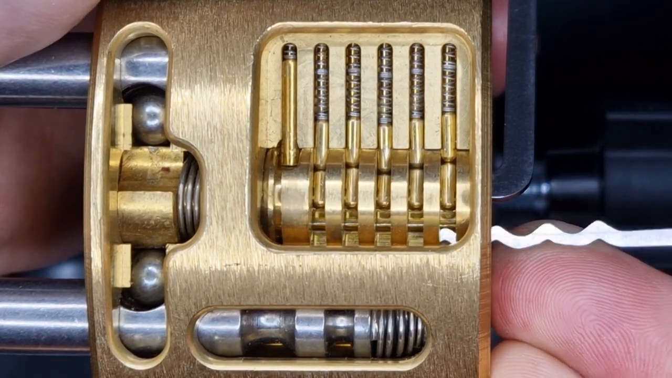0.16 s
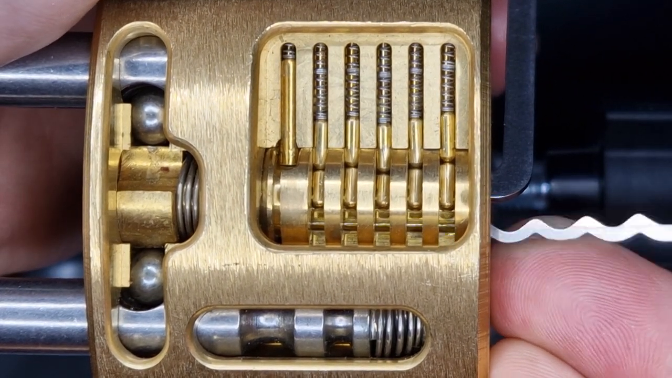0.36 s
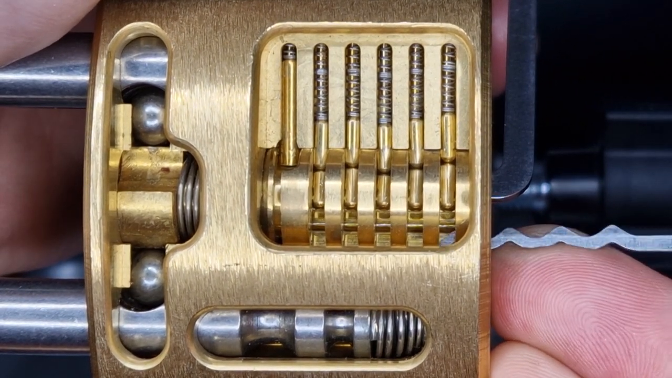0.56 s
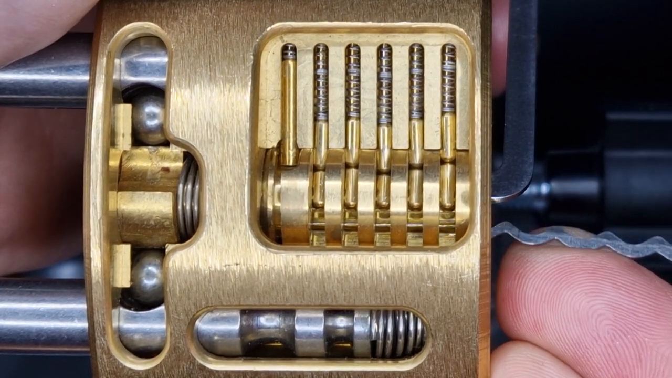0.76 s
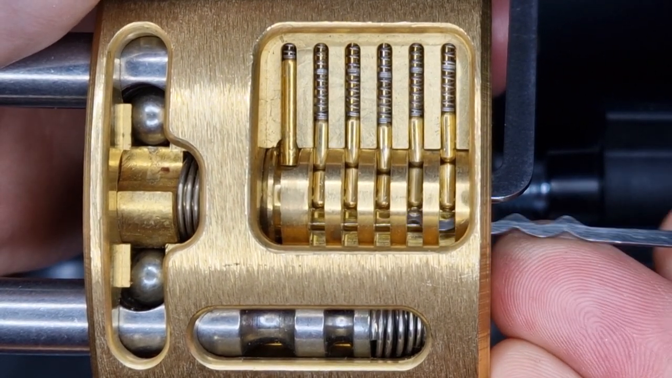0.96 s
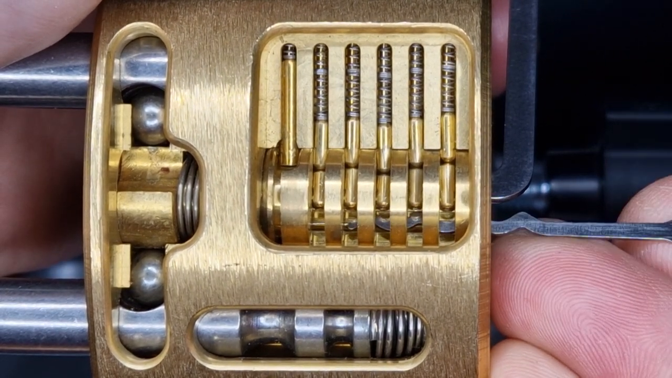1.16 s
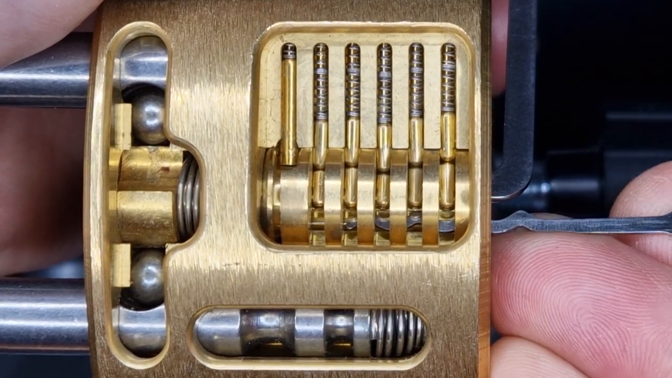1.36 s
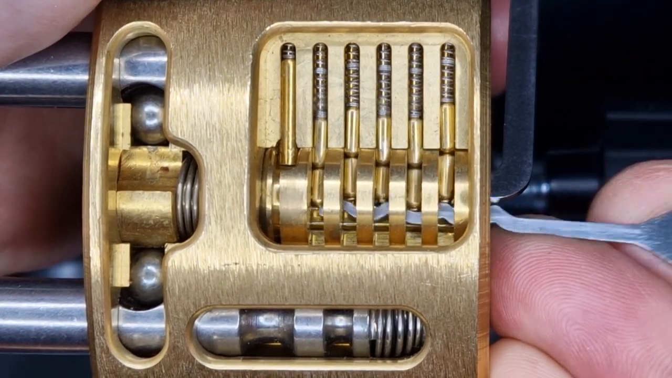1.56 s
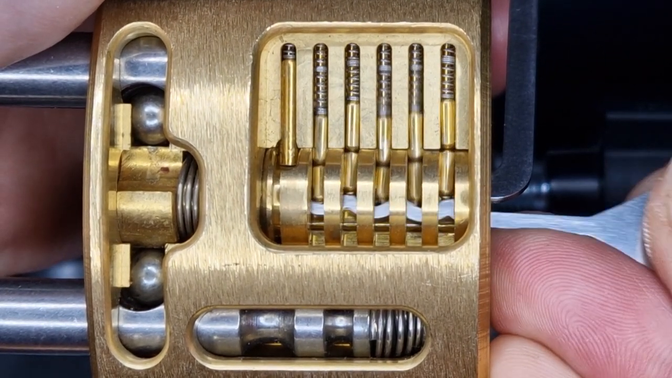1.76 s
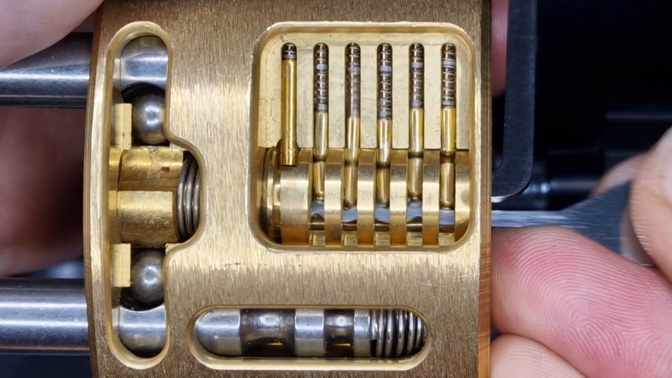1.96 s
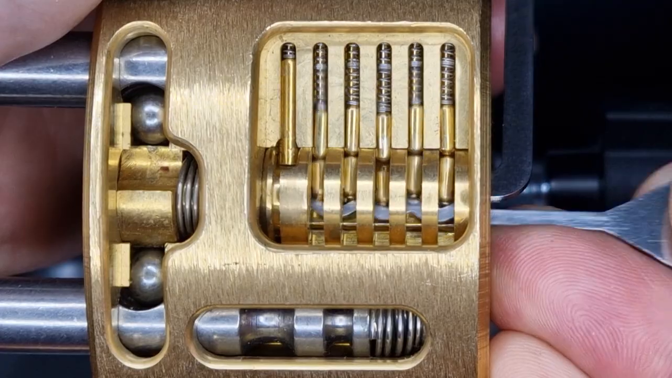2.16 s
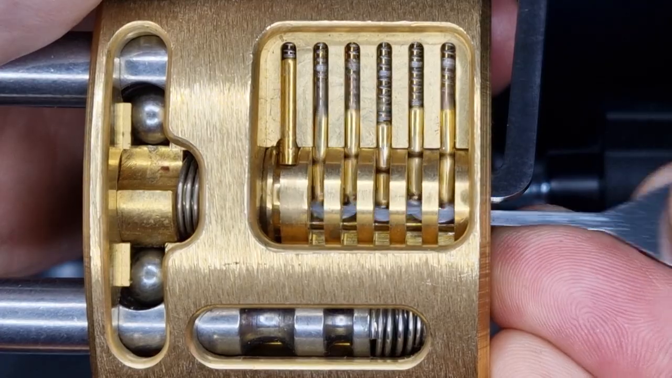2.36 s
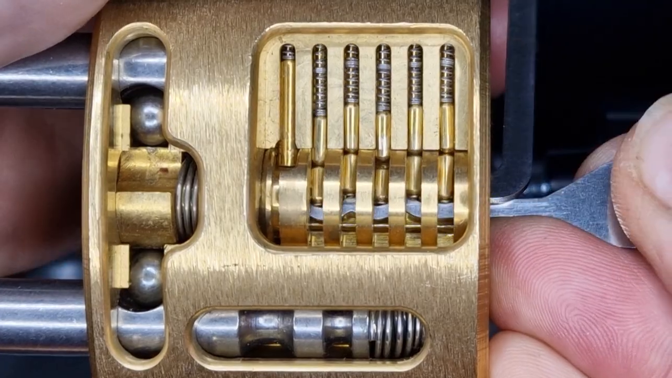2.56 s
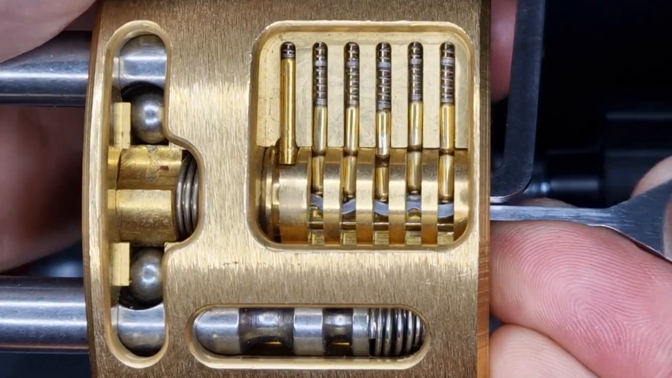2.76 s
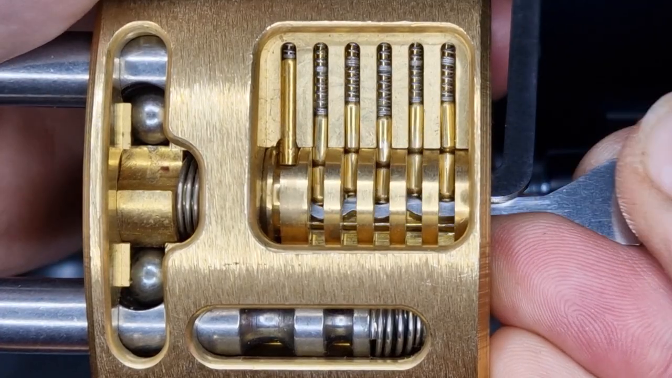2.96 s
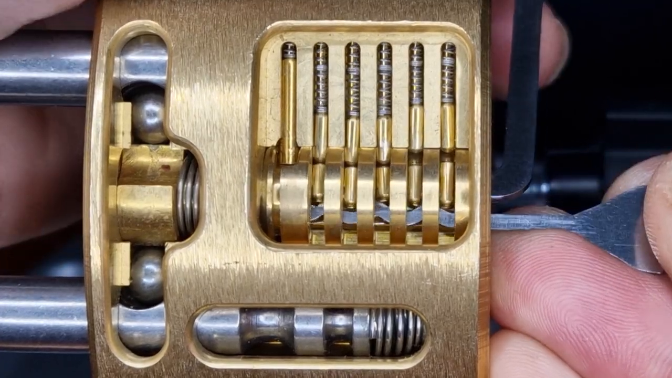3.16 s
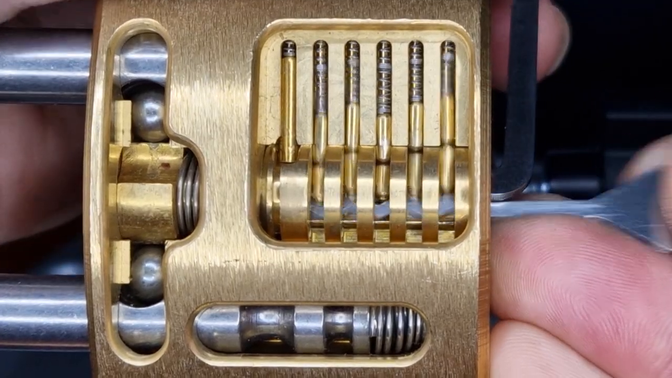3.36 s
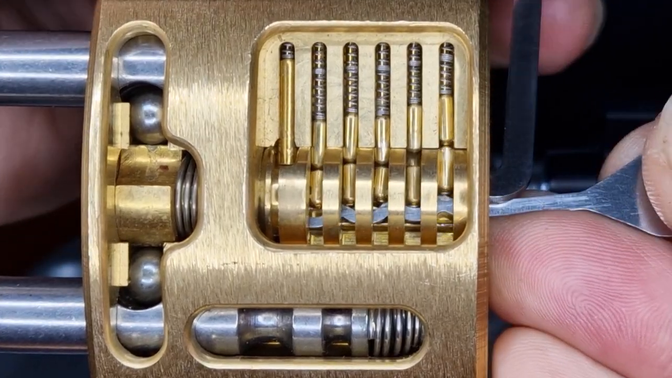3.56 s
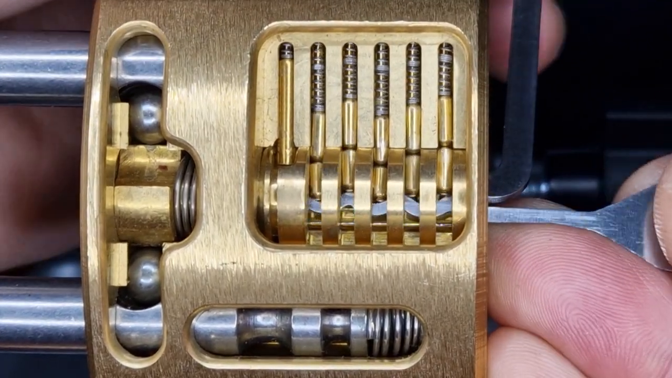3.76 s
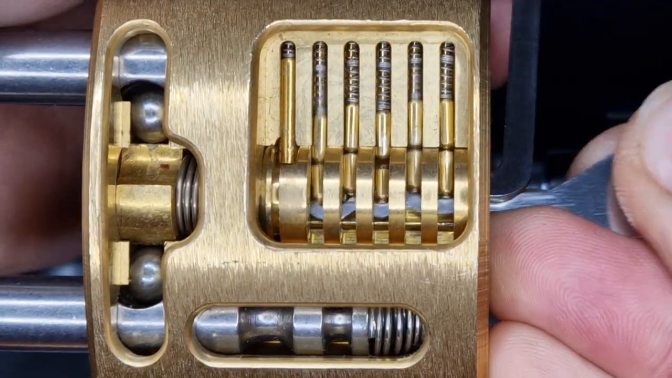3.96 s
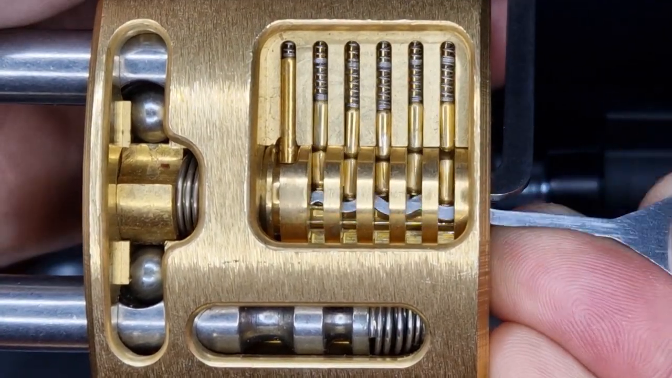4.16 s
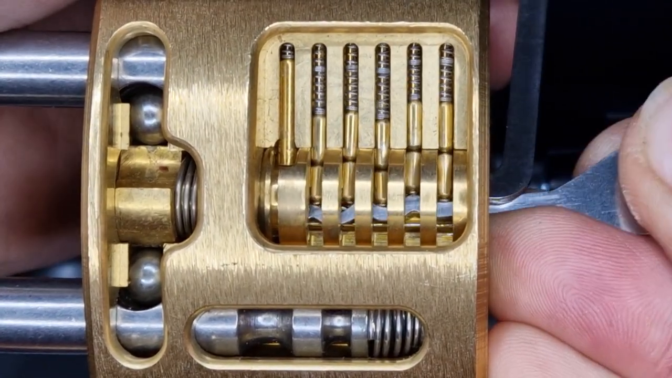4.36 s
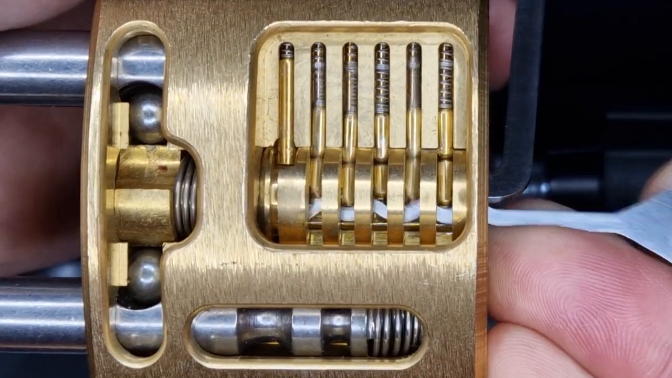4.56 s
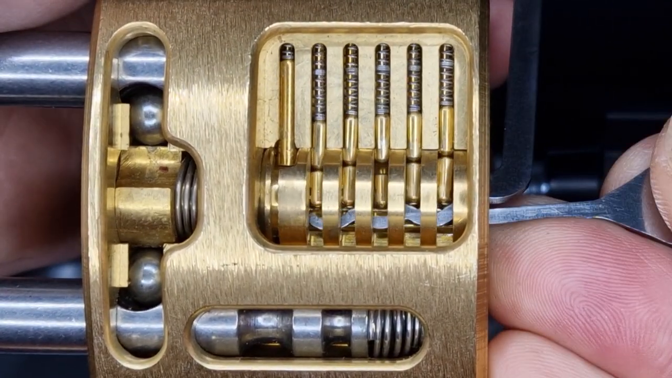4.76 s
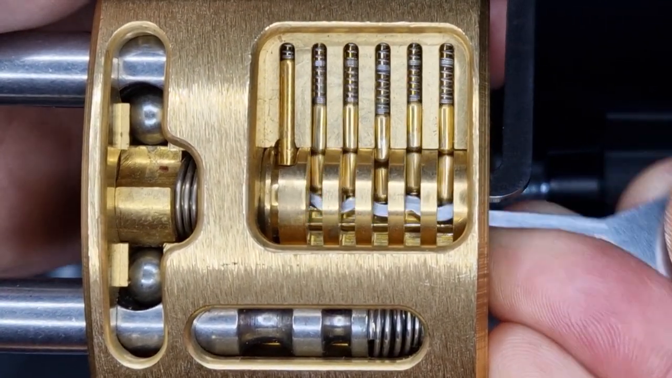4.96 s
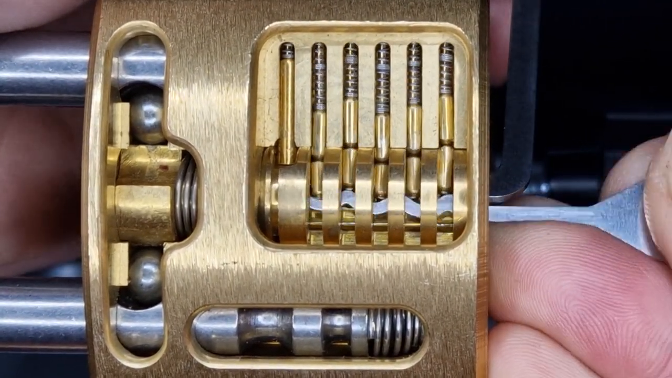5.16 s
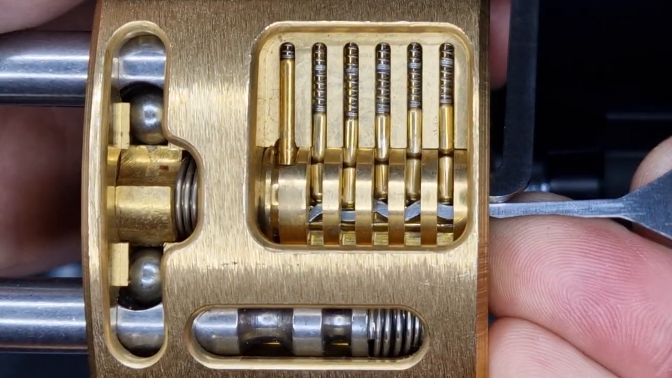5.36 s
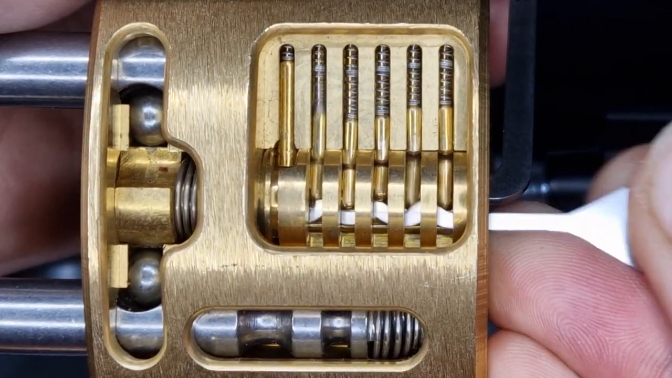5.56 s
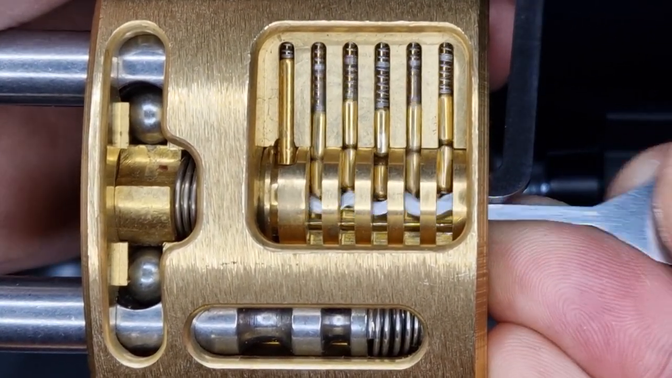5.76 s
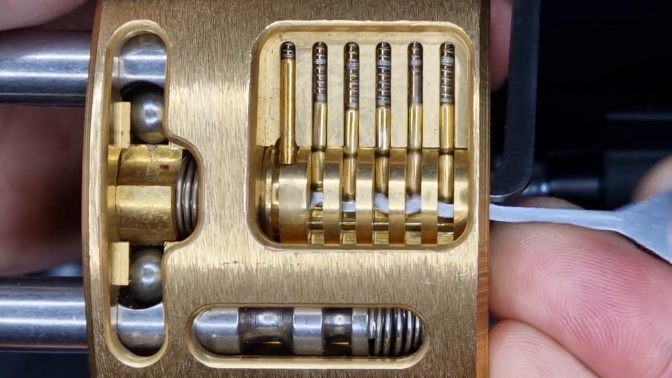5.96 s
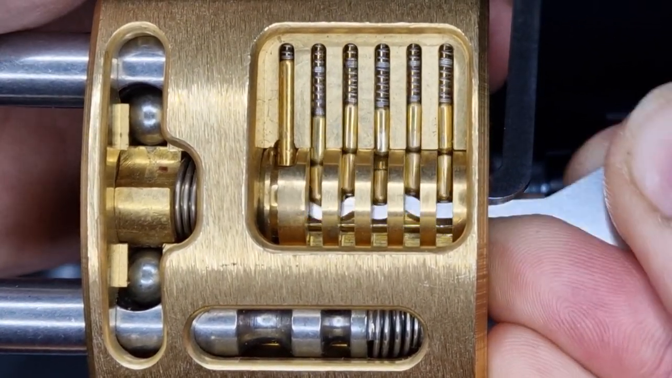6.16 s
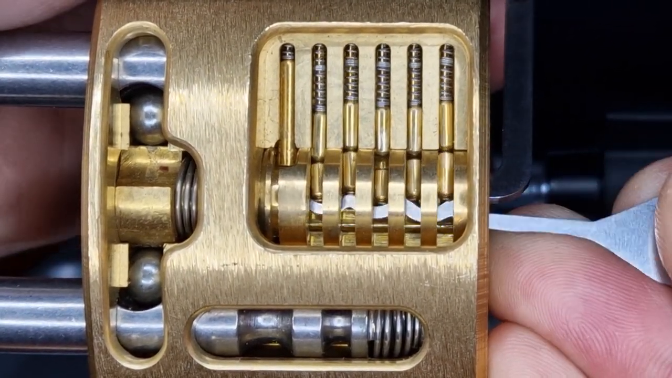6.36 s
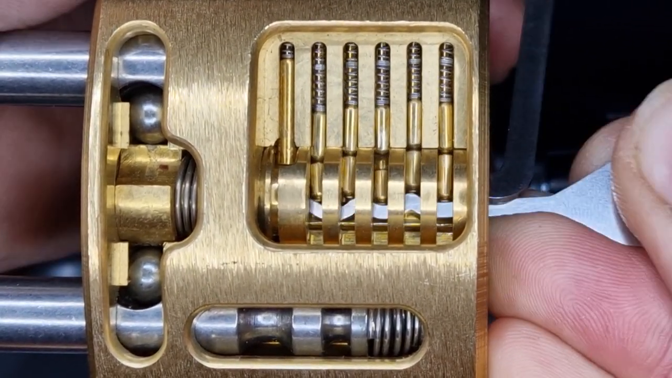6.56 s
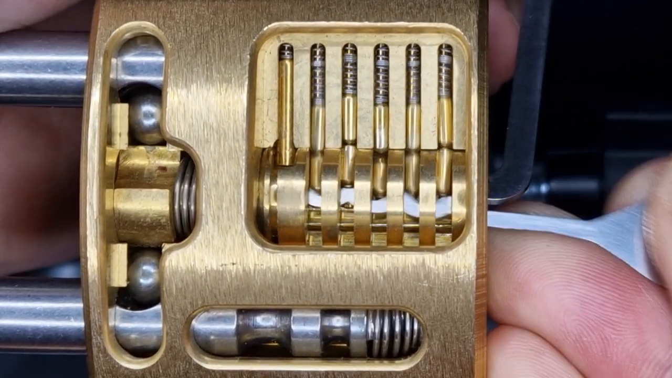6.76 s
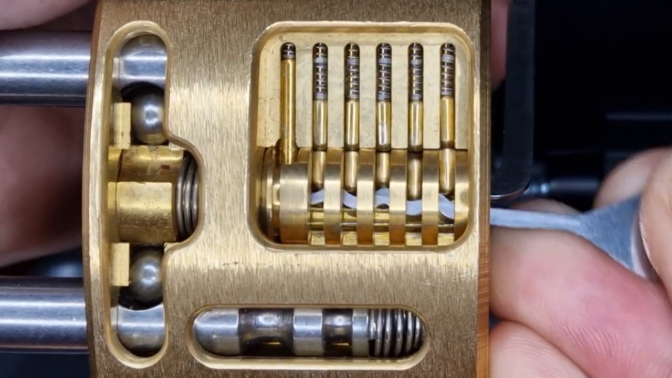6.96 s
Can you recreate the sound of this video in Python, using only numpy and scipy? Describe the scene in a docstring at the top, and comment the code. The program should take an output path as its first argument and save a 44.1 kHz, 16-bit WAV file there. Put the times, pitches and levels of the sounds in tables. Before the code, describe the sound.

A thin steel pick first taps faintly at a padlock's keyway, then slides in with small ticks and rasps. From about one and a half seconds it rakes rapidly back and forth, giving crisp, uneven bursts of metallic clicks with gritty scraping between them. Harder snaps knock the lock in its vice and thud softly through the bench. Very close stereo microphone, dry quiet room with low rumble and faint hiss.

```python
"""Raking a brass padlock

A wavy steel pick is raked in and out of a brass padlock held in a vice, close to a pair of microphone ports.
Each click is noise shaped by the lock's modes; rough grit in the same metal makes the scrape between clicks.
Shoves ring the low bench modes, hard hits knock the vice, and thin sine chirps squeak.
Before the main raking the free blade taps the keyway mouth. A quiet room of shaped noise hisses and rumbles."""
import sys
import numpy as np
from scipy import signal
from scipy.fft import rfft, irfft, next_fast_len
from scipy.io import wavfile
from scipy.ndimage import map_coordinates

SR = 44100
rng = np.random.default_rng(int(sys.argv[2]) if len(sys.argv) > 2 else 0)


def put_to_file(sound):
    """Save the sound as 16-bit audio at rate SR, in the file named by the first command-line argument."""
    columns = np.atleast_2d(sound).T  # one column per channel
    safe = np.clip(columns, -1, 1)
    whole_steps = np.round(safe * 32767)
    wavfile.write(sys.argv[1], SR, whole_steps.astype(np.int16))


N = 313110
SPAN = 8192  # longest ring, in samples


def amp(db):
    """Decibels to an amplitude factor."""
    return 10 ** (np.asarray(db) / 20)


def decay(t, t60):
    """Exponential decay that falls 60 dB in t60 seconds."""
    return amp(-60 * t / t60)


def unit(x):
    """Scaled to rms 1 over the whole array."""
    return x / np.sqrt(np.mean(np.abs(x) ** 2) + 1e-20)


def along(points, hz):
    """Interpolates (Hz, value) points on a log frequency axis."""
    f, v = np.transpose(points)
    return np.interp(np.log(hz + 1), np.log(f + 1), v)


def wobble(rate):
    """A smooth random curve with rate knots a second."""
    knots = rng.standard_normal(int(N * rate / SR) + 4)
    return map_coordinates(knots, [np.arange(N) * rate / SR])


def filtered(x, response):
    """Passes x through a complex response of frequency."""
    m = next_fast_len(N + SR // 2)
    return irfft(rfft(x, m) * response(np.fft.rfftfreq(m, 1 / SR)), m)[..., :N]


def rough(shape):
    """Noise under each row of envelopes, holding the energy of its envelope."""
    push = shape * rng.standard_normal(shape.shape)
    return push * np.sqrt(np.sum(shape ** 2, 1) / np.sum(push ** 2, 1))[:, None]


def resonances(modes, hz):
    """One causal band-pass response per mode, as rows of alternating sign."""
    centre, width, db = np.transpose(modes)[:, :, None]
    sign = (-1) ** np.arange(len(modes))[:, None]
    return sign * amp(db) * 1j * hz * width / (centre ** 2 - hz ** 2 + 1j * hz * width)


def struck(times, gains, modes, push, stretch=1):
    """Each push rings the modes at its own row of gains, their pitch stretched, and lands at its time."""
    response = gains @ resonances(modes, np.fft.rfftfreq(SPAN, 1 / SR))
    # reading the response at a divided frequency moves its peaks
    source_bin = np.arange(SPAN // 2 + 1) / stretch * np.ones((len(times), 1))
    source_bin = np.minimum(np.round(source_bin).astype(int), SPAN // 2)
    response = np.take_along_axis(response, source_bin, axis=1)
    rings = irfft(rfft(push, SPAN) * response, SPAN)

    # the ring holds the energy that the push gave
    due = np.mean(np.abs(response) ** 2, 1) * np.sum(push ** 2, 1)
    rings = rings * np.sqrt(due / (np.sum(rings ** 2, 1) + 1e-30))[:, None]
    at = np.round(times * SR).astype(int)[:, None] + np.arange(SPAN)
    return np.bincount(at.ravel(), rings.ravel(), N + SPAN)[:N]


# Phase between the ports. Each row: frequency in Hz, how far the left port leads in radians.
PORT_LEAD = [(500, 2.5), (1700, -2.5), (2300, -0.5), (3000, -2.5), (5000, -1), (6600, -4), (8500, -4.5),
             (10200, -6), (13400, -8), (16500, -16)]
# Level between the ports. Each row: frequency in Hz, left minus right in dB.
PORT_BALANCE = [(500, -4), (2000, -5), (4000, -8), (8000, -2), (14000, -0.5)]


def ports(shared, apart, share):
    """Two ports get the sound at different phases and levels, plus independent sound of like colour at each."""
    def turn(hz):
        half_lead = np.exp(.5j * along(PORT_LEAD, hz))
        return half_lead * amp(along(PORT_BALANCE, hz) / 2)

    direct = filtered(shared, lambda hz: np.array([turn(hz), 1 / turn(hz)]))
    return direct + share * np.array(apart)


# Pins tripping over the humps of the pick. Each row: time in seconds, relative level in dB.
PIN_CLICKS = [(0.0683, -58), (0.8574, -41), (0.9024, -34), (0.936, -41), (1.0257, -45.5), (1.086, -40.5),
              (1.515, -28), (1.5189, -25.5), (1.524, -33.5), (1.5492, -25.5), (1.5726, -33), (1.607, -47),
              (1.6692, -29), (1.677, -41), (1.727, -26.5), (1.7412, -30), (1.76, -25.5), (1.7778, -23.5),
              (1.804, -31), (1.8297, -26), (1.84, -23.5), (1.9309, -29.5), (1.9506, -25.5), (1.9645, -19.5),
              (1.987, -24.5), (1.994, -26), (2.01, -27.5), (2.0207, -30), (2.1296, -25.5), (2.1663, -22),
              (2.1816, -24), (2.1872, -33), (2.192, -20.5), (2.199, -36), (2.2283, -29), (2.24, -30),
              (2.307, -28.0), (2.3184, -24.5), (2.334, -27.5), (2.3443, -28.5), (2.3532, -26),
              (2.3653, -32), (2.4446, -27.0), (2.4572, -25.0), (2.4722, -24), (2.4802, -24.5),
              (2.5105, -32), (2.52, -24.5), (2.6046, -37), (2.6458, -27), (2.6543, -30.5), (2.662, -21.5),
              (2.675, -24), (2.6813, -20.0), (2.7, -29), (2.7743, -25.5), (2.7892, -25), (2.803, -23),
              (2.828, -28), (2.8466, -25.5), (2.8586, -30), (2.9658, -28.5), (3.0297, -40.0), (3.0415, -45),
              (3.1491, -32), (3.1813, -32.5), (3.207, -29), (3.228, -27.5), (3.3324, -22.5), (3.3412, -33),
              (3.3488, -17), (3.359, -32), (3.3676, -27), (3.4252, -31.5), (3.4411, -31.5), (3.474, -21.5),
              (3.482, -26.5), (3.536, -29), (3.6094, -39), (3.683, -30), (3.8289, -24), (3.8391, -30),
              (3.8469, -12.5), (3.86, -20), (3.9314, -38), (3.9515, -26.5), (3.9717, -27), (4.034, -26.5),
              (4.0527, -21), (4.0547, -15), (4.082, -23.5), (4.104, -28.0), (4.115, -41), (4.1385, -28.5),
              (4.196, -27), (4.2084, -20), (4.2335, -24), (4.2562, -30), (4.271, -20), (4.3435, -30.5),
              (4.3703, -24.5), (4.4265, -37), (4.4327, -27.5), (4.4387, -19), (4.4472, -20.0),
              (4.4544, -27), (4.4632, -22), (4.5512, -24.5), (4.5544, -19), (4.591, -26), (4.6287, -36),
              (4.643, -27), (4.774, -17), (4.7904, -25.5), (4.8648, -25.0), (4.9342, -23.5), (4.958, -29.5),
              (5.0572, -36), (5.0638, -30.5), (5.0729, -32), (5.0807, -23), (5.1, -36), (5.1693, -9.5),
              (5.199, -27), (5.206, -29), (5.2647, -22.5), (5.2737, -28.5), (5.2806, -28.5), (5.293, -30.0),
              (5.4037, -25.5), (5.4187, -27.0), (5.5112, -25.5), (5.5399, -24), (5.5557, -17.5),
              (5.6085, -30), (5.6152, -30.5), (5.6255, -20.5), (5.638, -27.5), (5.6456, -27),
              (5.657, -23.5), (5.6727, -26.5), (5.6856, -40), (5.7175, -26), (5.739, -27.5), (5.7493, -17),
              (5.766, -26.5), (5.7696, -21), (5.7783, -27), (5.7927, -25.5), (5.804, -31), (5.891, -24.5),
              (5.9064, -23), (5.9144, -18.5), (5.934, -18.5), (5.9392, -27), (5.9492, -21), (5.9559, -25.5),
              (6.0484, -19.5), (6.0555, -23.5), (6.068, -22), (6.0754, -24.5), (6.0831, -17.5),
              (6.088, -24.5), (6.099, -22), (6.118, -30), (6.133, -28), (6.21, -23), (6.2248, -29.5),
              (6.252, -24), (6.3189, -28.5), (6.4072, -16), (6.444, -26), (6.4575, -22.5), (6.4703, -27.5),
              (6.5029, -21), (6.508, -29.5), (6.573, -25.5), (6.5902, -26), (6.5955, -19.0),
              (6.6238, -22.0), (6.6307, -23), (6.6413, -21.5), (6.649, -28.5), (6.7348, -19.5),
              (6.7436, -17.0), (6.7585, -25), (6.7666, -22), (6.77, -23), (6.7812, -24.0), (6.7919, -26.5),
              (6.8044, -35), (6.87, -29.5), (6.8901, -28), (6.9283, -11.5), (7.0444, -28), (7.052, -27.5),
              (7.0891, -27), (7.096, -28.5)]
# Bluntness of a click: positive favours the low modes, negative the high ones.
BLUNT_DB, BLUNT_SCATTER_DB = -5.5, 2.5


def contacts():
    """Every click, as rows of seconds, relative dB and a randomly scattered bluntness in dB."""
    s, db = np.transpose(PIN_CLICKS)
    return np.array([s, db, BLUNT_DB + BLUNT_SCATTER_DB * rng.standard_normal(len(s))])


def activity(hits, before, after):
    """How hard the pick works: click energy spread over times in seconds before and after each click."""
    s, db, _ = hits
    energy = np.bincount(np.round(s * SR).astype(int), amp(2 * db), N)
    t = np.arange(-SR // 5, SR // 5) / SR
    spread = np.exp(-(t / np.where(t < 0, before, after)) ** 2)
    return np.sqrt(np.abs(signal.fftconvolve(energy, spread, "same")))


# Colour of the room noise. Each row: frequency in Hz, relative density in dB per Hz.
ROOM_HISS = [(15, -10), (25, 3.5), (175, -19), (350, -30), (600, -27), (1800, -29.5), (2600, -35.5),
             (6000, -40.5), (10000, -44), (13000, -37.5)]
HISS_DB = -64  # rms of the noise before the shared rumble joins it


def room():
    """Steady shaped noise hisses and rumbles, mostly unrelated between the ports."""
    noise = rng.standard_normal((3, N))
    left, right, common = unit(filtered(noise, lambda hz: amp(along(ROOM_HISS, hz))))
    low = filtered(common, lambda hz: hz < 500)  # long waves reach both ports alike
    return amp(HISS_DB) * np.array([left + 0.47 * low, right + 0.58 * low])


# Shoves passed to the bench. Each row: time in seconds, relative level in dB,
# relative level of the deep part in dB, strongest ring in Hz.
BENCH_SHOVES = [(0.457, -47.5, -7, 272), (1.029, -48.5, 3.5, 262), (1.515, -37.5, -14.5, 261),
                (1.965, -47.5, -19, 368), (2.181, -33.5, -6.5, 295), (2.681, -43, -16, 410),
                (2.79, -51, -17, 288), (3.191, -46.5, -18, 268), (3.356, -32, -12.5, 367),
                (3.476, -39, -3.5, 257), (3.85, -40.5, 1, 354), (4.056, -32, -7.5, 382),
                (4.274, -42.5, -9, 265), (4.444, -32, -11.5, 360), (4.773, -25, -10, 256),
                (5.171, -41.5, 2.5, 355), (5.282, -44, -7.5, 264), (5.552, -43, -30, 270),
                (5.629, -41.5, -22, 264), (5.772, -40, -9.5, 288), (5.921, -41.5, -1.5, 249),
                (6.055, -28.5, -7, 249), (6.411, -33, -8.5, 400), (6.502, -30.5, -5.5, 265),
                (6.647, -28, -12, 358), (6.731, -32, -3, 266), (6.929, -26.5, -19, 436)]
# Low modes of the bench. Each row: frequency in Hz, width in Hz, relative level in dB.
BENCH_MODES = [(58.5, 17.4, -2), (87, 25.8, 0), (127.3, 42.7, 1), (165.4, 41.7, -1), (265.9, 22.7, 0),
               (359.3, 14, -0.5), (426.2, 31, -4.5)]


def bench(hits):
    """Soft shoves ring the bench's low modes, the deep ones swelling later; the working hands keep it stirring."""
    s, db, deep_db, ring_hz = np.transpose(BENCH_SHOVES)
    mode_hz = np.transpose(BENCH_MODES)[0]
    deep = mode_hz < 200
    t = np.arange(SPAN * 3 // 4) / SR
    each = np.ones((len(s), 1))

    gains = amp(db[:, None] + 24.5 + 2 * rng.standard_normal((len(s), len(deep))))
    # where the shove lands picks the mode: 18 dB less per octave away
    near = amp(-18 * np.abs(np.log2(mode_hz / ring_hz[:, None])))
    knock = rough((decay(t, 0.11) + 2.25 * decay(t, 0.0043)) * each)
    heave = rough(t / 0.013 * decay(t, 0.22) * each)
    shoved = struck(s, gains * near * ~deep, BENCH_MODES, knock)
    shoved = shoved + struck(s, gains * deep * amp(deep_db[:, None] - 4.5), BENCH_MODES, heave)

    stir = rng.standard_normal((3, N)) * amp(3.2 * wobble(25))
    stir = unit(filtered(stir, lambda hz: resonances(BENCH_MODES, hz).sum(0)))
    working = amp(-74.5) + amp(-36.0) * activity(hits, 0.006, 0.047)
    mid, *apart = working * stir

    both = (shoved + mid) * amp([[-.6], [.6]]) + 0.6 * np.array(apart)
    return filtered(both, lambda hz: 1 / (1 + (hz / 480) ** 8))  # soft contact: nothing bright


# Modes of pins, pick and lock body. Each row: frequency in Hz, width in Hz, relative level in dB.
LOCK_MODES = [(1076, 430, -21), (1558, 43, -10), (1762, 190, -13), (2206, 37, -9), (2950, 280, -13.5),
              (3554, 190, -9), (4285, 550, -6), (4590, 830, -3.5), (4990, 580, -1), (5430, 420, -4),
              (6340, 700, -7.5), (7346, 130, 1.5), (8080, 930, -7.5), (9130, 380, -7.5), (10035, 390, -3),
              (12480, 3600, -9.5), (14580, 1840, -3.5), (15660, 760, -10)]
LEAD_IN_S = .0022  # the scrape level swells over about this time before each click


def scrape(hits):
    """The blade's rough edge sends uneven ticks into the lock's metal while it works; a duller rub lingers."""
    # the level of each mode wanders at random, so the scrape's colour varies
    sway = amp(4 * np.array([wobble(30) for _ in LOCK_MODES]))

    def colours(hz):
        bright = hz / (hz + 2500)
        dull = 1 / (1 + (hz / 6000) ** 2)
        return np.array([bright, dull])

    def heard():
        grit = rng.standard_normal(N) * amp(6.7 * wobble(400) + 1.6 * wobble(86))
        metal = (sway * filtered(grit, lambda hz: resonances(LOCK_MODES, hz))).sum(0)
        ticks, rub = (unit(layer) for layer in filtered(metal, colours))
        ticks = amp(-23) * activity(hits, LEAD_IN_S, 0.0052) * ticks
        rub = amp(-35) * activity(hits, 0.013, 0.039) * rub
        return ticks + rub

    return ports(heard(), [heard(), heard()], 0.77)


SIDE_SCATTER_DB = 3.5  # random left-right spread of each mode, drawn anew for every click
DETUNE = 0.02  # random pitch shift of all modes, as a fraction, from click to click


def clicks(hits):
    """A click is a snap and a short rattle; chatter of pin and spring, then the room, die away behind it."""
    s, db, blunt_db = hits[:, :, None]
    hz, width, mode_db = np.transpose(LOCK_MODES)
    t = np.arange(SPAN * 3 // 4) / SR

    luck = rng.random(s.shape)
    t60 = 0.0065 * amp(0.45 * (db + 52.5) + 10.1 * (luck - 1.5))  # harder drops rattle longer
    rattle = (1 - np.exp(-t / .0003)) * (decay(t, .0042) + 0.17 * decay(t, t60))
    chatter = amp(-22.0) * decay(t, 0.057)
    room_tail = amp(-39.5) * decay(t, 0.18)
    after = (1 - np.exp(-t / 0.00029)) * (chatter + room_tail)

    # bluntness tilts the modes about 8 kHz; each click also gets a random mix of mode levels
    tilt_db = blunt_db * np.clip(np.log2(8000 / hz), -.6, .6)
    colour_db = tilt_db + np.where(hz < 3300, 3, 3.5) * rng.standard_normal(tilt_db.shape)
    energy = (amp(colour_db + mode_db) ** 2 * width).sum(1, keepdims=True)
    gains = amp(db + 48.0 + colour_db) / np.sqrt(energy)
    stretch = 1 + DETUNE * rng.standard_normal(s.shape)

    def rung(mode_gains, push):
        return struck(s[:, 0], mode_gains, LOCK_MODES, push, stretch)

    own = 0.6 * rattle + 1.75 * after
    side = amp(SIDE_SCATTER_DB * rng.standard_normal(gains.shape))
    push = rough(rattle + after)
    direct = np.array([rung(gains * side, push), rung(gains / side, push)])
    return ports(direct, [rung(gains, rough(own)), rung(gains, rough(own))], 0.55)


# Light taps of the pick at the keyway mouth, its blade still free to ring.
# Each row: time in seconds, relative level in dB, extra gain of the lowest mode in dB.
BLADE_TAPS = [(0.268, -63.5, 9.5), (0.294, -56, -4), (0.349, -72, 10), (0.454, -57.5, 2),
              (0.462, -55.5, -6.5), (0.491, -56, -5), (0.703, -58, -10)]
# Modes of the free blade. Each row: frequency in Hz, width in Hz, relative level in dB.
BLADE_MODES = [(3070, 100, 2.5), (4100, 270, -14), (5950, 200, 5), (7400, 380, -14), (8250, 380, -14),
               (10240, 180, -9), (13500, 2300, -25)]


def taps():
    """A brief contact sets the free blade's modes ringing, with a faint tail."""
    s, db, lowest_db = np.transpose(BLADE_TAPS)
    t = np.arange(SPAN // 4) / SR
    gains = amp(db[:, None] + 20 + 2.5 * rng.standard_normal((len(s), len(BLADE_MODES))))
    gains[:, 0] *= amp(lowest_db)
    shape = (decay(t, 0.0046) + amp(-22.5) * decay(t, 0.16)) * np.ones((len(s), 1))

    def heard():
        return struck(s, gains, BLADE_MODES, rough(shape))

    return ports(heard(), [heard(), heard()], 0.95)


# Faint steel chirps. Each row: centre in seconds, length in seconds, pitch in Hz, level in dB.
STEEL_SQUEAKS = [(0.895, 0.045, 2190, -72), (1.183, 0.075, 2730, -75), (3.709, 0.022, 2270, -63)]


def squeaks():
    """Short thin tones from steel sliding on steel, slightly unsteady in level and phase."""
    t = np.arange(N) / SR
    total = np.zeros(N)
    for s, length, hz, db in STEEL_SQUEAKS:
        swell = amp(db + wobble(30)) * np.exp(-(2 * (t - s) / length) ** 2)
        total += swell * np.sin(2 * np.pi * hz * t + .3 * wobble(60))
    return total


# Hard hits that rock the lock in the vice. Each row: time in seconds, relative level in dB.
VICE_KNOCKS = [(1.085, -51), (2.186, -44), (2.676, -34), (3.348, -30.5), (3.554, -45.5), (3.848, -38.5),
               (4.053, -28), (4.081, -26), (4.27, -38), (4.436, -31.5), (4.553, -37.5), (4.771, -36),
               (4.862, -42), (5.17, -21), (5.92, -34), (6.071, -28), (6.406, -33.5), (6.649, -33.5),
               (6.771, -29), (6.928, -25.5)]
# Modes of the vice. Each row: frequency in Hz, width in Hz, relative level in dB.
VICE_MODES = [(784, 210, -4), (860, 92, 3), (1100, 266, -1.5)]


def knocks():
    """Hard hits also sound the vice's modes, a short woody knock."""
    s, db = np.transpose(VICE_KNOCKS)
    t = np.arange(SPAN // 4) / SR
    gains = amp(db[:, None] + 13 + 2.5 * rng.standard_normal((len(s), len(VICE_MODES))))
    shape = (decay(t, 0.0047) + amp(-15.5) * decay(t, 0.11)) * np.ones((len(s), 1))

    def heard():
        return struck(s, gains, VICE_MODES, rough(shape))

    return ports(heard(), [heard(), heard()], 0.51)


def scene():
    """All layers at the two ports; the clicks also drive the scrape and the stirring of the bench."""
    hits = contacts()
    raking = scrape(hits) + clicks(hits)
    return room() + bench(hits) + raking + taps() + squeaks() + knocks()


TOP_HZ = 15900  # upper band limit, 6 dB down


def record(dry):
    """A very steep low-pass removes nearly everything above the band limit."""
    return filtered(dry, lambda hz: 1 / (1 + (hz / TOP_HZ) ** 60))


dry = scene()
out = record(dry)
put_to_file(out)
```